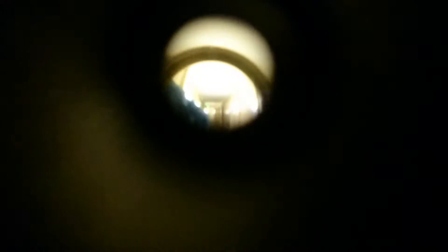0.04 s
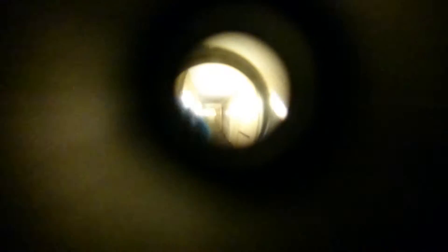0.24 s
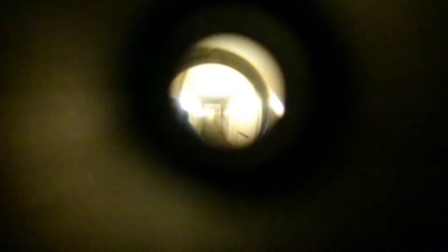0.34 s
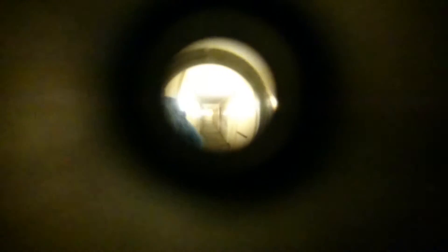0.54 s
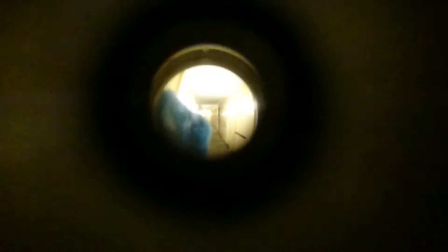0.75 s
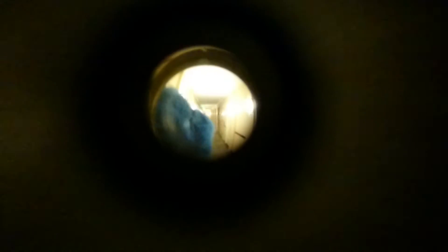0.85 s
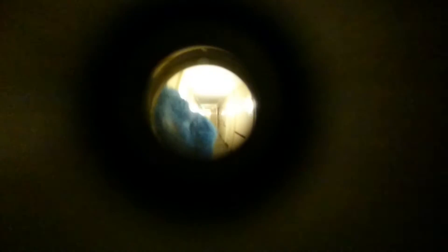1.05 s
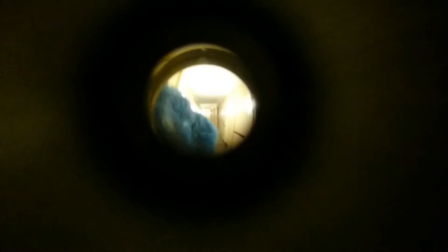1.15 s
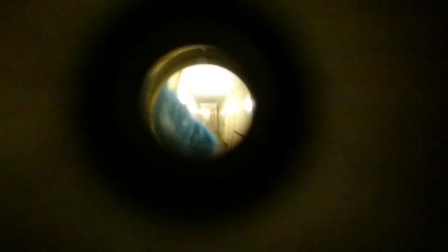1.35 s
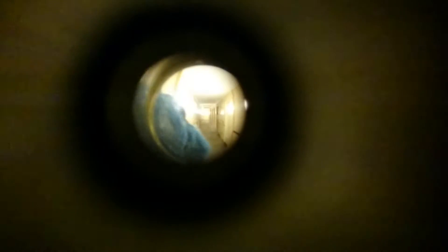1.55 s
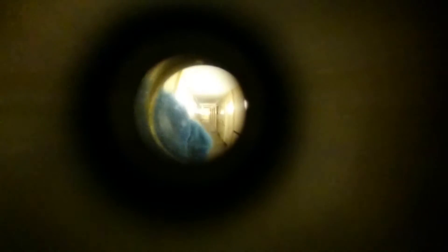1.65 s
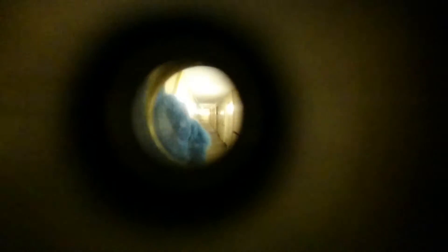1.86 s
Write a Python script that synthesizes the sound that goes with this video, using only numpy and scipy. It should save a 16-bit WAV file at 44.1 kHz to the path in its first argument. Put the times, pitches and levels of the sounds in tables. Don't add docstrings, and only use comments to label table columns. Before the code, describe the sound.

Heard from inside against a hotel door: soft handling rubs and bumps from the start, clustering near 0.2 seconds, then a huge overloaded bang at 0.36 with deep boom, shaking latch and chain, and a hard bump at 0.41. A metal click at 0.64, faint taps near 0.9, a short scrape around 1.07. A second, slightly softer bang at 1.53 rattles and clicks, ringing briefly over low hiss.

```python
import sys
import numpy as np
from scipy import signal
from scipy.fft import rfft, irfft
from scipy.io import wavfile
from scipy.ndimage import uniform_filter1d

SR = 44100
rng = np.random.default_rng(int(sys.argv[2]) if len(sys.argv) > 2 else 0)


def volts(x):
    e = np.asarray(x, float) / 20
    return 10 ** e


def output_pcm(signal):
    pcm = np.clip(np.atleast_2d(signal).T, -1, 1) * 32767
    wavfile.write(sys.argv[1], SR, np.round(pcm).astype(np.int16))


N = 83790
t = np.arange(N) / SR

# start_s, level_db, sway_left_right_db
BLOWS = [
    (.364, -2, -22),
    (1.526, -4.5, -13),
]


def unit(x):
    return x / np.sqrt(np.mean(x ** 2))


def noise_pair():
    return rng.standard_normal((2, N))


def ring(x, hz, t60_s):
    pole = np.exp((2j * np.pi * hz - np.log(1000) / t60_s) / SR)
    return signal.lfilter([1], [1, -pole], x)


def band(x, hz, width_hz):
    return signal.lfilter(*signal.iirpeak(hz, hz / max(width_hz, 30), SR), x)


def high_pass(x, order, hz):
    return signal.lfilter(*signal.butter(order, hz, "high", fs=SR), x)


def colour(x, tone):
    hz, db = np.array(tone).T
    bins_hz = np.maximum(np.arange(N // 2 + 1) * SR / N, 1)
    gain = volts(np.interp(np.log(bins_hz), np.log(hz), db))
    return unit(irfft(rfft(x) * gain, N))


def flicker(rate_hz, db):
    k = int(SR / rate_hz)
    wander = uniform_filter1d(uniform_filter1d(rng.standard_normal(N), k), k)
    return volts(db * unit(wander))


def push(start_s, length_s):
    force = np.sin(np.pi * np.clip((t - start_s) / length_s, 0, 1)) ** 2
    return force / force.sum()


def decay(start_s, level_db, t60_s, rise_s):
    fall = volts(level_db - 60 * np.maximum(t - start_s, 0) / t60_s)
    return fall * np.clip((t - start_s) / rise_s, 0, 1)


def pan(left_right_db):
    return volts(np.array([[left_right_db / 2], [-left_right_db / 2]]))


def floor():
    # hz, db_per_hz
    hiss_tone = [(18, -31), (30, 20.5), (141, 5), (245, 2), (569, -42), (1280, -34), (6050, -25),
                 (6550, -40.5), (16000, -53)]
    # time_s, level_db
    air_level = [(0, -51.5), (.35, -53.5), (.5, -49), (.8, -53), (.96, -57.5), (1.15, -69), (1.52, -73),
                 (1.6, -56.5), (1.9, -53)]
    # hz, db_per_hz
    air_tone = [(240, -35), (400, 3), (579, -8), (839, -8), (2290, -11), (2800, -11), (5350, -5),
                (8110, -29.5), (12500, -33.5), (14800, -20.5)]
    hiss = volts(-46) * colour(noise_pair(), hiss_tone)
    air_gain = volts(-0.5 + np.interp(t, *np.array(air_level).T))
    air = pan(1) * air_gain * colour(noise_pair(), air_tone) * flicker(25, 1.5)
    rumble = volts(-54) * unit(band(noise_pair(), hz=29.5, width_hz=35))
    return hiss + air + rumble


def room(bright, boom):
    tail = 0
    for level_db, t60_s in ((-17, 0.34), (-36, 0.35)):
        tail = tail + volts(level_db) * unit(noise_pair() * volts(-60 * t / t60_s)) / np.sqrt(N)
    tail = signal.lfilter(*signal.butter(3, 6800, fs=SR), tail)
    second_blow_gain = volts(1.5 * (t > 1.5))
    sent = (bright + volts(-33.5) * boom) * second_blow_gain
    return signal.fftconvolve(sent, tail, axes=1)[:, :N]


def scrape():
    # time_s, level_db
    drag_level = [(1.025, -67.5), (1.029, -50.5), (1.062, -44.5), (1.067, -43), (1.077, -45.5),
                  (1.089, -41.5), (1.1, -62), (1.123, -51.5), (1.149, -74.5)]
    # hz, db_per_hz
    drag_tone = [(530, -56), (900, -19), (1300, -14.5), (1850, -13.5), (2150, -18), (2410, -6.5),
                 (4200, -4.5), (4960, 4.5), (11000, -35), (14300, -80), (22000, -120)]
    slip_rate_hz = 9150
    slips = (rng.random(N) < slip_rate_hz / SR) * volts(1.2 * rng.exponential(size=N)) * noise_pair()
    tone = colour(slips, drag_tone)
    tone = tone + volts(-9) * band(tone, 4930, 500) + volts(3) * band(tone, 2450, 300)
    time_s, level_db = np.array(drag_level).T
    gain = volts(3.5 + np.interp(t, time_s, level_db, left=-120, right=-120))
    return pan(6.5) * unit(tone) * flicker(300, 1.7) * gain


def bumps():
    # start_s, level_db, pitch_ratio, t60_s
    contacts = [(0.205, -7.5, 1.01, 0.2), (0.217, -14, 0.8, 0.094), (0.236, -21, 1.37, 0.11),
                (.243, -15.5, 0.97, 0.24), (0.276, -14.5, 0.76, 0.022), (0.4133, 18.5, .58, 0.027),
                (0.419, 1.5, 0.97, 0.11), (0.498, -20, 0.92, 0.16), (0.855, -21.5, 0.33, 0.24),
                (0.871, -22, 0.77, 0.045), (0.976, -31, 1.2, 0.16), (1.023, -34.5, 0.88, 0.038),
                (1.465, -21.5, 0.97, .03), (1.494, -18.5, 0.8, 0.03), (1.502, -29, 1.14, 0.06)]
    # hz, level_db, t60_ratio
    body_modes = [(229, -4.5, 0.89), (242, -2.5, 0.79), (350, -3.5, 0.06), (622, -18, 0.75),
                  (650, -37, 0.16)]
    # start_s, level_db, pitch_hz, t60_s
    edge_taps = [(0.4124, -5, 1100, 0.021), (.419, 13.5, 900, .01), (.421, -9, 2200, .012),
                 (0.851, -32, 302, 0.015), (0.877, -31, 383, 0.011), (0.884, -33.5, 446, 0.0086),
                 (0.976, -15.5, 420, 0.0087), (0.9798, -20, 450, 0.0075), (0.9866, -24.5, 420, 0.0095),
                 (1.4656, -28, 530, 0.0094), (1.4951, -25.5, 530, .012), (1.5013, -20.5, 520, .015)]
    # middle_s, length_s, level_db
    slides = [
        (0.034, .16, -28),
        (0.224, 0.17, -30),
        (0.363, 0.16, -36.5),
        (0.884, 0.2, -45.5),
        (1.107, 0.078, -47.5),
    ]
    # hz, db_per_hz
    slide_tone = [(35, -40.5), (60, -6), (237, 1), (449, -20), (595, -13), (893, -27), (1300, -26),
                  (2500, -38.5), (3250, -72), (5500, -120)]
    out = 0
    for start_s, level_db, pitch, t60_s in contacts:
        force = push(start_s, 0.0021 * np.clip(t60_s / 0.24, .7, 1))
        for hz, mode_db, share in body_modes:
            out = out - volts(level_db + mode_db) * ring(force, hz * pitch, t60_s * share).imag
    out = high_pass(out, 2, 110)
    for start_s, level_db, hz, t60_s in edge_taps:
        out = out - volts(level_db) * ring(push(start_s, .4 / hz), hz, t60_s).imag
    slide = 0
    for middle_s, length_s, level_db in slides:
        slide = slide + volts(level_db) * np.cos(np.pi * np.clip((t - middle_s) / length_s, -.5, .5)) ** 2
    out = out + slide * flicker(140, 2.2) * colour(rng.standard_normal(N), slide_tone)
    return out * np.array([[1], [volts(-41)]])


def bolt():
    # start_s, pitch_hz, level_db, t60_s, left_right_db
    pings = [(0.6437, 5400, -26.5, 0.022, 17), (.6442, 4700, -25.5, 0.0067, 23),
             (0.6458, 2800, -29.5, 0.019, 14), (.648, 4020, -31.5, 0.021, 18),
             (0.913, 5000, -46.5, 0.023, 15), (0.916, 3300, -44, 0.019, 8), (.978, 3500, -45.5, 0.033, 10),
             (1.066, 5000, -35, 0.045, 13), (1.092, 4000, -40, 0.023, 2), (1.5948, 6230, -19, 0.014, 4),
             (1.5942, 4890, -16, 0.023, 9), (1.5947, 2730, -42, 0.058, 0),
             (1.598, 4016, -20.5, 0.027, 23.5), (1.536, 5400, -13.5, 0.015, 14.5),
             (1.541, 4000, -18, 0.057, 16), (0.373, 5800, -0.5, 0.022, -1)]
    out = 0
    for start_s, hz, level_db, t60_s, pan_db in pings:
        force = push(start_s, 0.00055) * np.cos(2 * np.pi * hz * t)
        out = out + 2 * pan(pan_db) * volts(level_db) * ring(force, hz, t60_s).imag
    return out


def rattles(bursts, tone):
    # hz, width_hz, level_db
    metal_modes = [(2830, 260, -10), (4180, 460, 6.5), (4500, 34, -42.5), (4850, 120, -6),
                   (7540, 33, -19.5)]
    env = 0
    for start_s, level_db, t60_s, pan_db in bursts:
        env = env + pan(pan_db) * decay(start_s, level_db, t60_s, rise_s=.0008)
    impacts = noise_pair() * volts(3.2 * rng.exponential(size=N)) * flicker(560, 1.6)
    metal = 0
    for k, (hz, width_hz, level_db) in enumerate(metal_modes):
        metal = metal + (-1) ** k * volts(level_db) * band(impacts * env, hz, width_hz)
    return volts(-11) * metal / impacts.std() + volts(-8.5) * env * colour(impacts, tone)


def latch():
    # start_s, level_db, t60_s, left_right_db
    shakes = [(.366, -23, 0.082, 30), (.370, 8.5, 0.036, 3.5), (.374, 2, 0.048, -9), (.378, -6, 0.043, -17),
              (.384, -2, 0.056, 11), (.390, -12.5, 0.065, 11), (.400, -10.5, 0.0087, 20),
              (.408, -19, 0.053, 2), (.4135, -7, 0.015, 35.5), (.396, -11, 0.027, -3),
              (.421, -34.5, 0.14, -1.5), (1.526, -12, 0.25, 3.5), (1.533, 11.5, 0.038, -2),
              (1.5405, -8.5, 0.06, 1.5), (1.547, -16.5, 0.13, 12.5), (1.553, -17, 0.053, 3),
              (1.563, -42, 0.085, 4)]
    # hz, db_per_hz
    shake_tone = [(180, 1), (300, 3.5), (567, 2), (2100, -7), (2790, -4), (5460, 3), (7400, -17.5),
                  (14700, -42), (16500, -50.5)]
    # start_s, level_db, t60_s, left_right_db
    clicks = [
        (.644, -17, 0.032, -0.5),
        (.664, -37, 0.049, 7),
        (.679, -37.5, 0.045, 11),
        (.915, -32.5, 0.038, 11),
        (.976, -42, 0.048, 9),
        (1.286, -50.5, 0.066, 8),
        (1.5954, -11, 0.018, 16.5),
        (1.6, -16.5, 0.041, -2),
    ]
    # hz, db_per_hz
    click_tone = [(880, -52.5), (1700, -33), (2730, -5), (3280, -5.5), (4010, 1), (4500, -7.5), (5300, 1),
                  (12000, -71), (15600, -95), (22000, -120)]
    return rattles(shakes, shake_tone) + rattles(clicks, click_tone)


def shudder():
    # level_db, t60_s, centre_hz, width_hz
    mode_bands = [
        [(-13.5, 0.25, 370, 690), (-19.5, 0.53, 120, 480), (-17.5, 1.1, 50, 41)],
        [(-15.5, 0.13, 950, 1200), (-27, 0.37, 240, 110), (-22.5, 0.31, 170, 96)],
    ]
    out = 0
    for (start_s, *_), rows in zip(BLOWS, mode_bands):
        for level_db, t60_s, hz, width_hz in rows:
            noise = unit(band(band(noise_pair(), hz, width_hz), hz, width_hz))
            out = out + decay(start_s, level_db, t60_s, rise_s=0.015) * noise
    return pan(4.9) * out


def door():
    # hz, level_db, t60_s
    sway_modes = [
        [(24.16, 2, 0.47), (12.37, -11, 1.64), (27.86, -14, 0.92), (19.64, -19, 1.5), (33.26, -19, 0.8),
         (47.5, -22, .5)],
        [(25.8, 3.5, 0.53), (16.8, -22.5, 2.1), (35.5, -16.5, 1.9), (12.14, -17, 1.6)],
    ]
    # level_db, hz, t60_s
    heaves = [
        (-2, 8.5, 0.28),
        (-9, 7.1, .3),
    ]
    # hz, first_blow_db, second_blow_db, t60_s
    panel_modes = [(57.4, -21, -9, 0.69), (100.46, 3.5, 6.5, 0.43), (126.8, 3, 0.5, 0.33),
                   (172.6, -5, -12.5, 0.063), (196.6, -2, -11.5, 0.27), (232, -11.5, -33.5, 0.91),
                   (256, -2.5, 5, 0.21), (351, 11.5, -4, 0.26), (355, -23, -68, 2.5), (407, -23, -45, .2),
                   (526.6, -13.5, -9.5, 0.087), (695, -5.5, -2.5, 0.27), (815, -8.5, 0.5, 0.092),
                   (1100, -13, -13, .08)]
    t60_ratios = [0.91, 0.7]
    left_only = np.array([[1], [0]])
    port_phase = np.exp(1j * np.array([[0], [.8]]))
    sway = boom = 0
    for k, (start_s, level_db, pan_db) in enumerate(BLOWS):
        shove = -volts(level_db) * push(start_s, 0.012)
        for hz, mode_db, t60_s in sway_modes[k]:
            sway = sway + pan(pan_db) * volts(mode_db) * ring(shove, hz, t60_s).real
        heave_db, heave_hz, heave_t60_s = heaves[k]
        sway = sway + left_only * volts(heave_db) * ring(shove, heave_hz, heave_t60_s).imag
        recoil = volts(-1) * push(start_s + .0055, 0.0017)
        knock = volts(level_db) * (recoil - push(start_s + 0.0014, 0.0045))
        for mode in panel_modes:
            port_gain = volts(rng.standard_normal((2, 1))) * port_phase
            tone = ring(knock, mode[0], mode[3] * t60_ratios[k])
            boom = boom + (port_gain * volts(mode[1 + k]) * tone).imag
    return volts(-6) * sway, volts(-16) * pan(6) * boom


def scene():
    sway, boom = door()
    bright = latch() + bolt() + scrape()
    return floor() + room(bright, boom) + bumps() + bright + shudder() + boom + sway


def low_pass(x):
    return signal.sosfilt(signal.butter(12, 16780, fs=SR, output="sos"), x)


def record(dry):
    clip, softness = .74, 6
    x = dry / (1 + np.abs(dry / clip) ** softness) ** (1 / softness)
    x = high_pass(x, 1, 3)
    x = x - 0.56 * high_pass(x, 2, 7500)
    x = signal.sosfilt(signal.ellip(8, .2, 70, 16400, fs=SR, output="sos"), x)
    x = np.clip(x, -.86, .86)
    return low_pass(x)


dry = scene()
out = record(dry)
output_pcm(out)
```